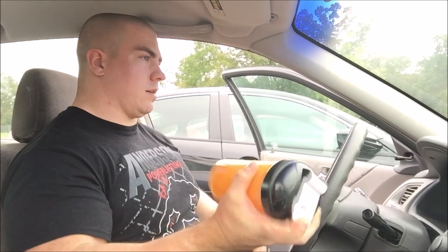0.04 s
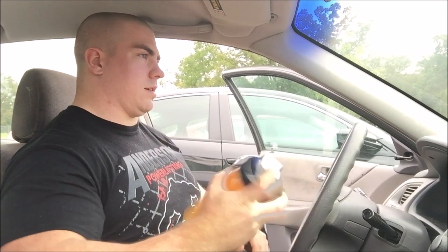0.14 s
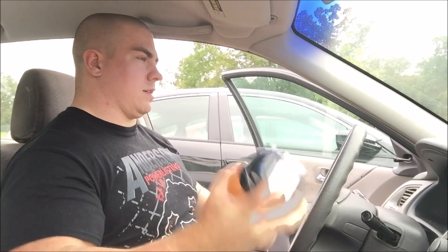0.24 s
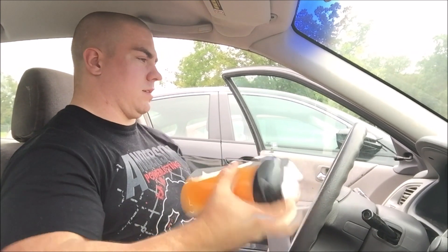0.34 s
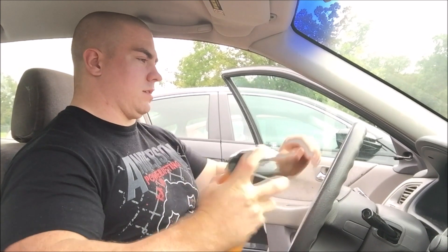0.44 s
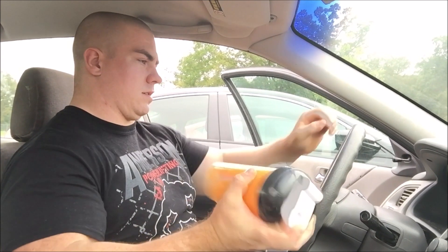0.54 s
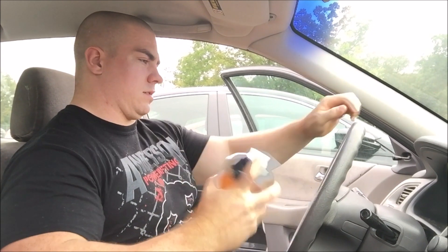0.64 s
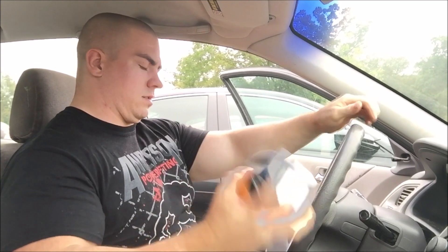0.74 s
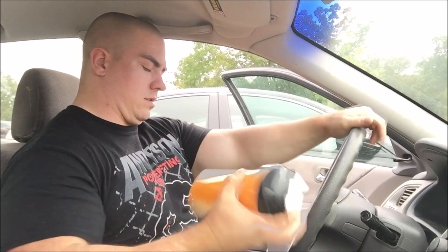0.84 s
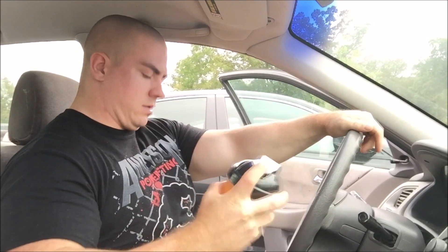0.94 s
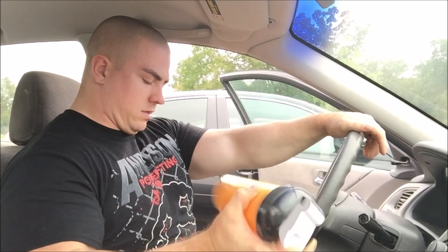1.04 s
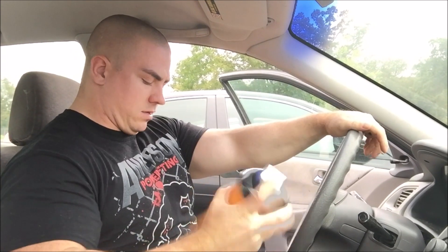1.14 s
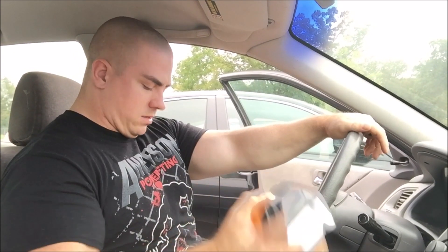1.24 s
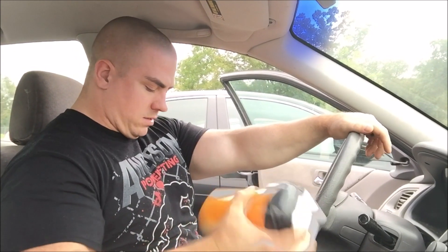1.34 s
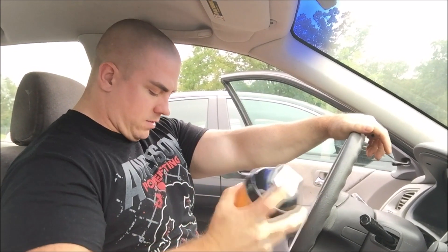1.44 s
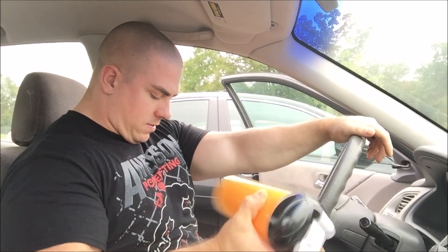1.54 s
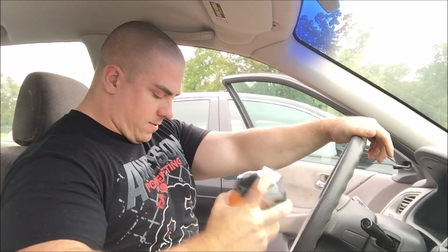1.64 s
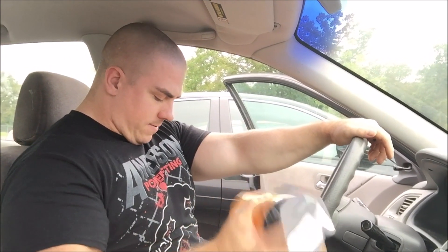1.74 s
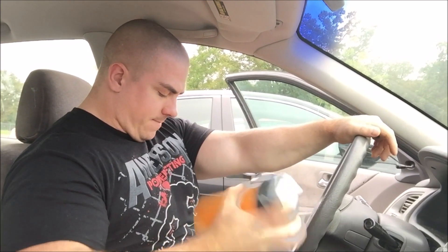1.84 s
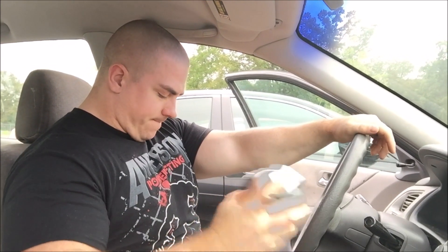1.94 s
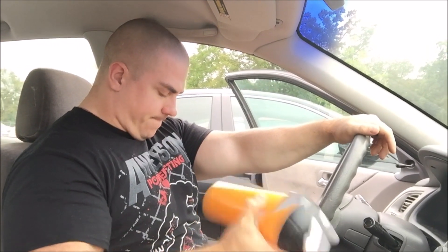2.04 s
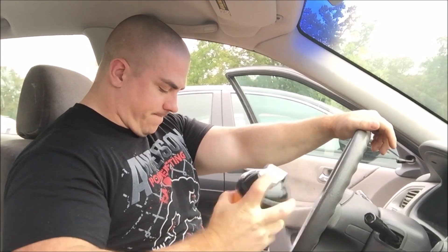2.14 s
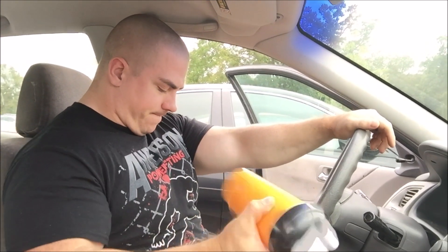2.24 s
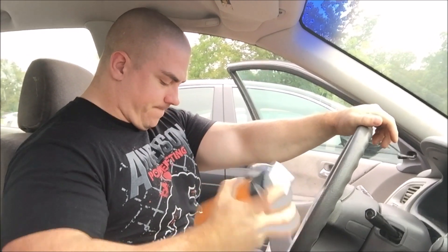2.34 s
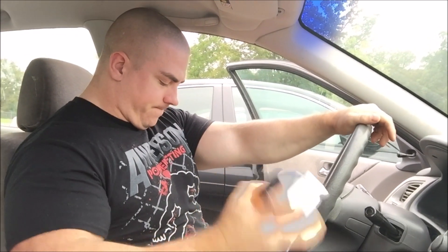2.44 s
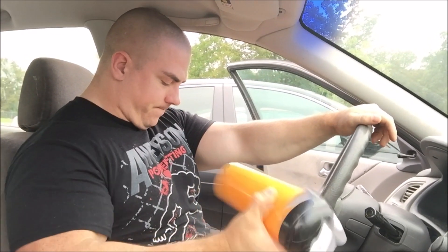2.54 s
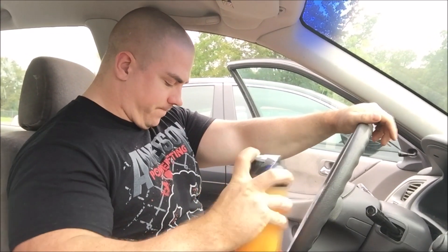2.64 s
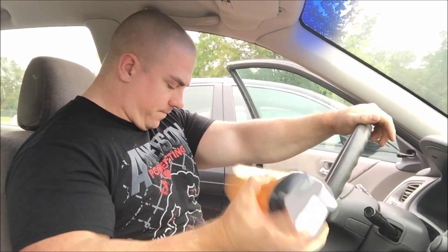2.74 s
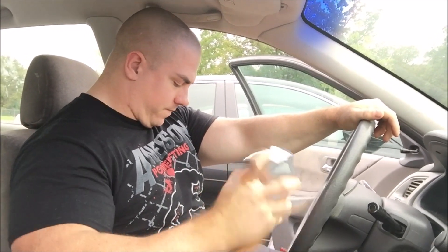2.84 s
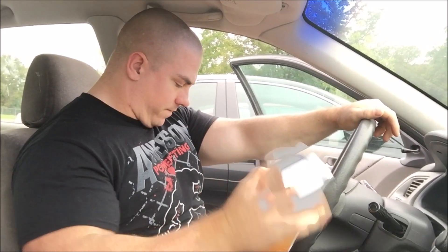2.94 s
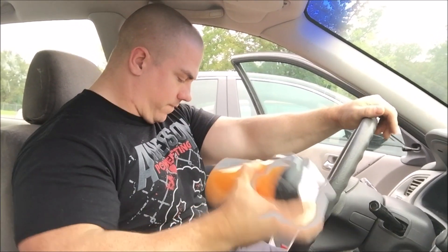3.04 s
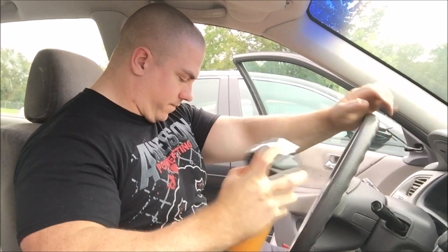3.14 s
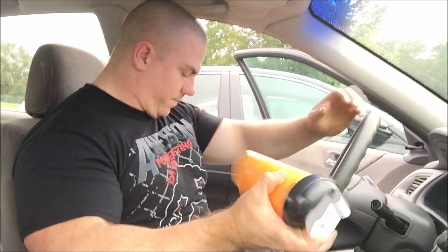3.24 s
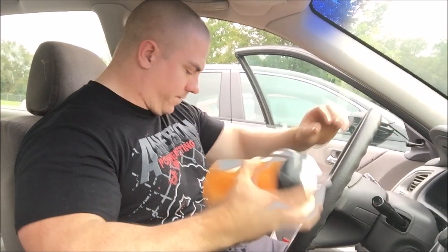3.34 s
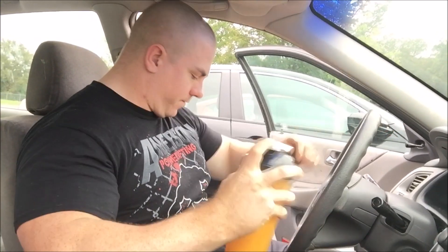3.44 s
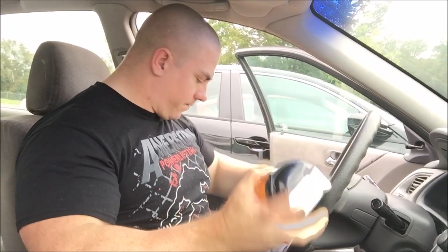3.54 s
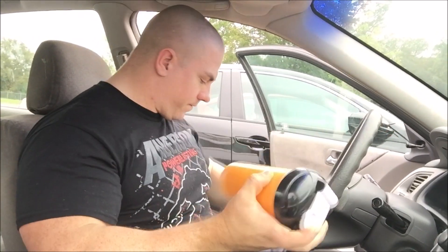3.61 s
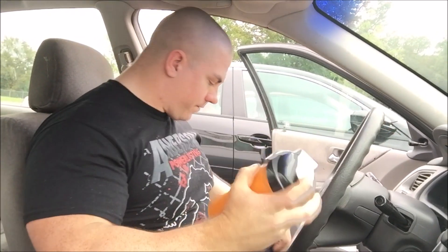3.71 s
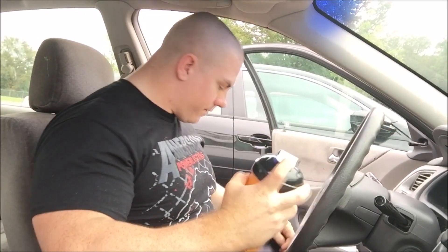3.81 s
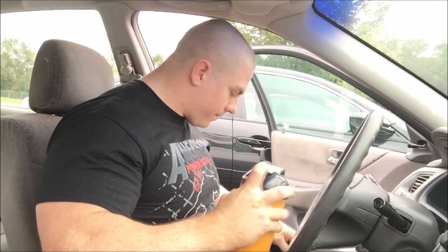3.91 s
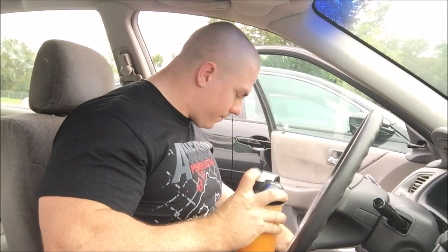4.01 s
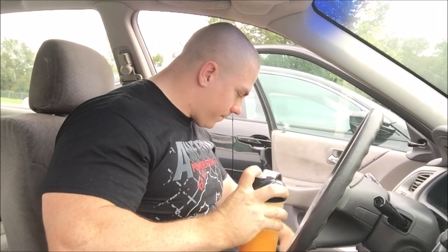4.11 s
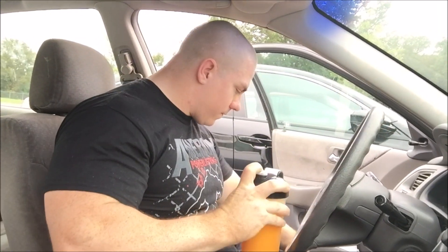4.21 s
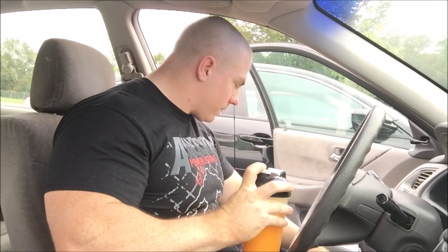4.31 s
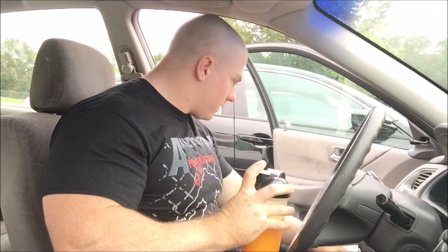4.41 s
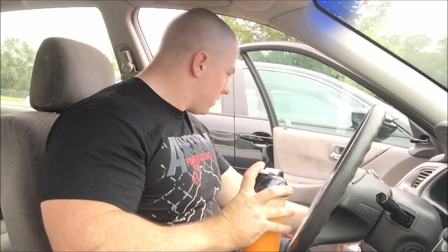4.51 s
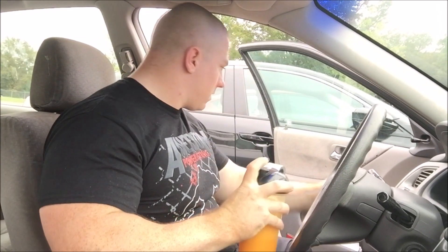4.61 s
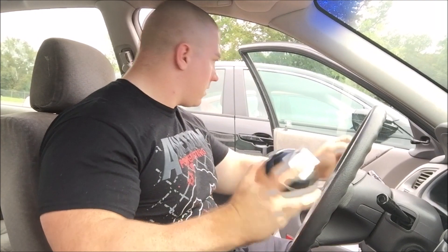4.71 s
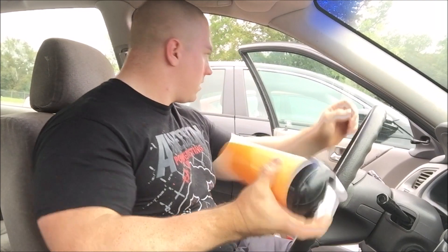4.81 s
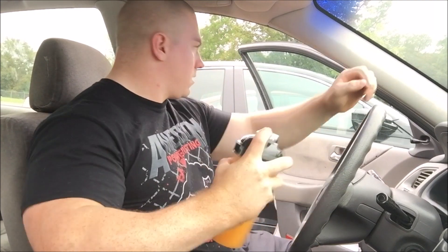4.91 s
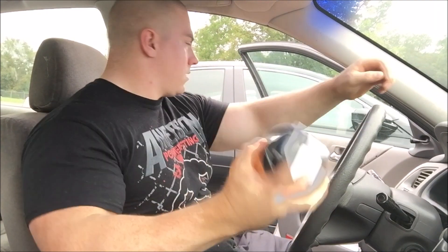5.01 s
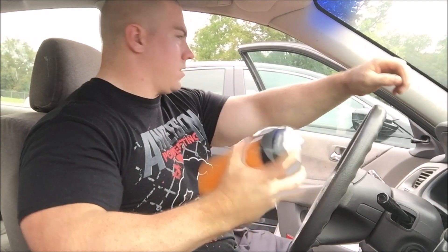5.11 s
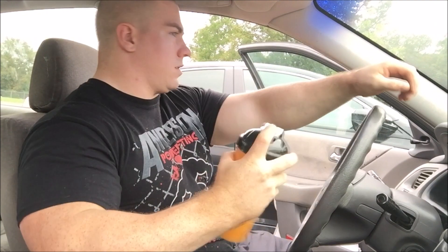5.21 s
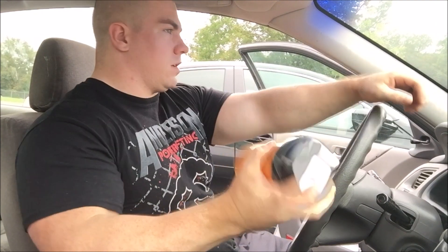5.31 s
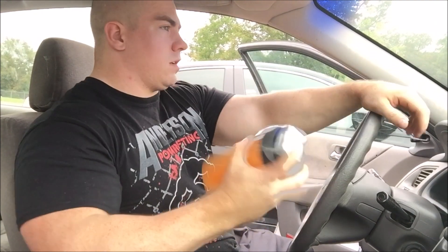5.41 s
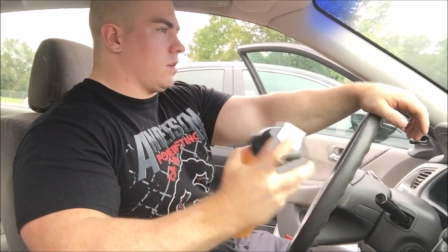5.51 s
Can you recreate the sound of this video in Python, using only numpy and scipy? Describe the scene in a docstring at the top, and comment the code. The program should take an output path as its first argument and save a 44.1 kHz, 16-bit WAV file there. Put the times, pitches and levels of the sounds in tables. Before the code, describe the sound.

Inside a parked car with a door open, liquid sloshes rapidly in a plastic bottle, clicking against the lid and gulping at the base. After more than three seconds it settles, and a soft low bump and a faint tick are heard before a last short round of shaking. The sound is close and fairly dry, with a low rumble from outside and two very faint hums underneath.

```python
"""Liquid sloshes in a plastic shaker bottle, shaken hard in a parked car with the door open.
About eight times a second it slams into the lid (bright spray, short rings of the cap) or into the
base (lower rings, dull glugs of trapped air). Low outdoor rumble runs underneath, with two dull bumps
and two faint hums. The shaking pauses, a small tick sounds, and the shaking briefly resumes."""
import sys
import numpy as np
from scipy import signal
from scipy.fft import rfft, irfft, next_fast_len
from scipy.io import wavfile

SR = 44100
rng = np.random.default_rng(int(sys.argv[2]) if len(sys.argv) > 2 else 0)


def wav_record(signal):
    """Record a signal, one row per channel, as 16-bit PCM in the file named by sys.argv[1]."""
    frames = np.transpose(np.atleast_2d(signal))
    bounded = np.clip(frames, -1, 1)
    # unit amplitude maps onto the largest positive 16-bit level
    quanta = np.round(bounded * 32767).astype(np.int16)
    wavfile.write(sys.argv[1], SR, quanta)


N = 245460


def amp(db):
    """dB to gain."""
    return 10 ** (np.asarray(db) / 20)


def unit_rms(x):
    """Scale to rms 1."""
    return x / np.sqrt(np.mean(x ** 2) + 1e-20)


def curves(rows):
    """Columns of a breakpoint table, one value per sample."""
    times_s, *columns = np.transpose(rows)
    return [np.interp(np.arange(N) / SR, times_s, column) for column in columns]


def add(out, start_s, sound):
    """Mix a sound in at start_s."""
    at = round(start_s * SR)
    out[at:at + len(sound)] += sound[:N - at]


def coloured(x, spectrum):
    """Shape x by a spectrum, -80 dB outside its ends; rms 1."""
    hz, db = np.transpose(spectrum)
    size = next_fast_len(N)
    log_hz = np.log(np.maximum(np.arange(size // 2 + 1) * SR / size, 1))
    gain = amp(np.interp(log_hz, np.log(hz), db, left=-80, right=-80))
    return unit_rms(irfft(rfft(x, size) * gain, size)[:N])


def drift(rate_hz):
    """Slow random wander; rms 1."""
    pole = np.exp(-2 * np.pi * rate_hz / SR)
    return unit_rms(signal.lfilter([1], [1, -2 * pole, pole ** 2], rng.standard_normal(N + SR))[SR:])


def ring(peak_db, hz, t60_s, rise_s, glide=0.):
    """One mode swells and dies; its pitch ends at hz * (1 + 2 * glide)."""
    t = np.arange(int(t60_s * SR)) / SR
    envelope = (1 - np.exp(-t / rise_s)) * amp(-60 * t / t60_s)
    phase = 2 * np.pi * hz * t * (1 + glide * t / t60_s)
    return amp(peak_db) * envelope / envelope.max() * np.sin(phase)


def droplets(spectrum, spread_db, clump_db, clump_hz):
    """Dense drop impacts of uneven size, in clumps."""
    sizes = amp(spread_db * np.minimum(rng.exponential(1, N), 5))
    return coloured(rng.standard_normal(N) * sizes * amp(clump_db * drift(clump_hz)), spectrum)


def pings(spectrum, low_hz, high_hz, per_s, cycles, spread_db, pitches=20):
    """Bursting bubbles or rattled plastic: random impulses, each ringing at one of many pitches."""
    sizes = amp(spread_db * np.minimum(rng.exponential(1, N), 5))
    hits = sizes * (rng.random(N) < per_s / SR)
    pitch_index, out = rng.integers(0, pitches, N), np.zeros(N)
    for k, hz in enumerate(np.geomspace(low_hz, high_hz, pitches)):
        r, w = amp(-60 * hz / cycles / SR), 2 * np.pi * hz / SR
        drive = hits * (pitch_index == k) + 1e-18
        out += signal.lfilter([0, np.sin(w)], [1, -2 * r * np.cos(w), r * r], drive)
    return coloured(out, spectrum)


# Liquid running along the wall: (time [s], bright level [dB], low level [dB])
SLOSH_LEVELS = [(0, -55.5, -54.5), (1.45, -61.5, -59), (1.52, -65, -55.5), (1.6, -63.5, -59.5),
                (2.56, -59, -56.5), (2.61, -70, -77), (2.66, -55, -54), (3.4, -59, -60), (3.47, -67, -56),
                (3.53, -61, -63), (3.68, -76, -65.5), (3.75, -76, -69), (3.95, -83.5, -66),
                (4.15, -80.5, -73), (4.925, -87, -79), (4.95, -73, -69), (5.57, -65, -61)]


def slosh_power(offsets_db=(6.5, 3.0, -7.0, 3.0, -3.5, 5.0)):
    """Sloshing between slams; one power curve per stream: splash, cap, spray, belly, gulp, wall."""
    bright_db, low_db = curves(SLOSH_LEVELS)
    levels_db = np.array([bright_db, bright_db, bright_db, low_db, low_db, bright_db])
    return amp(levels_db + np.array(offsets_db)[:, None]) ** 2


# Spectra of the six streams: (frequency [Hz], relative level [dB])
SPLASH_SPECTRUM = [(1800, 1), (2700, -1.5), (3400, -0.5), (4300, -0.5), (4860, -5), (5360, -2),
                   (7500, -12.5), (9500, -38)]
CAP_SPECTRUM = [(1900, -18), (2200, -0.5), (2350, -4.5), (2500, -1), (2650, -21.5), (2900, -20), (3300, 13)]
SPRAY_SPECTRUM = [(5500, 2), (7900, -2.5), (10200, -8), (11300, -7.5), (15100, -14.5), (16500, -17)]
BELLY_SPECTRUM = [(600, -18), (760, -13), (930, -8), (1150, -8.5), (1480, -6.5), (1950, -9.5), (2400, -31)]
GULP_SPECTRUM = [(170, 1), (260, -3), (330, -1), (450, -0.5), (560, -10.5), (700, -17)]
WALL_SPECTRUM = [(1400, -1.5), (1800, -8.5), (1950, -4), (2100, -2), (2250, -10.5), (2500, -17.5),
                 (2900, 5)]


def liquid(power, foam_share=0.38, mix_db=(-1.5, -5.5, -3.0, -0.5, 0.25, -5.5)):
    """Liquid splashes, foams, sprays and gulps, and rings cap, belly and wall, following power."""
    drops = droplets(SPLASH_SPECTRUM, spread_db=2.5, clump_db=3.5, clump_hz=61)
    foam = pings(SPLASH_SPECTRUM, 2445, 8600, per_s=1400, cycles=49, spread_db=2.5, pitches=45)
    splash = np.sqrt(1 - foam_share) * drops + np.sqrt(foam_share) * foam
    cap = pings(CAP_SPECTRUM, 2257, 2670, per_s=600, cycles=63, spread_db=2.5)
    wall = pings(WALL_SPECTRUM, 1740, 2710, per_s=1500, cycles=31, spread_db=3.0, pitches=30)
    spray = droplets(SPRAY_SPECTRUM, spread_db=2.0, clump_db=2.5, clump_hz=31)
    belly = pings(BELLY_SPECTRUM, 705.5, 2320, per_s=600, cycles=37, spread_db=-0.5)
    gulp = droplets(GULP_SPECTRUM, spread_db=1.5, clump_db=2.5, clump_hz=23.5)
    streams = np.array([splash, cap, spray, belly, gulp, wall])
    return amp(mix_db) @ (np.sqrt(power) * streams)


# Outdoor rumble: (time [s], level [dB])
RUMBLE_LEVELS = [(0, -40), (.2, -47.5), (.45, -44.5), (1, -47), (1.85, -44), (3, -51), (5.57, -47)]


def rumble(band_hz=(48, 95)):
    """Bass noise from outdoors swells and ebbs."""
    bandpass = signal.butter(3, band_hz, "band", fs=SR, output="sos")
    return amp(curves(RUMBLE_LEVELS)[0]) * unit_rms(signal.sosfilt(bandpass, rng.standard_normal(N)))


# Outdoor noise: (frequency [Hz], relative level [dB])
OUTDOOR_SPECTRUM = [(25, -33), (38, -16), (70, -7), (150, -11.5), (240, -14.5), (340, -23), (450, -35),
                    (1100, -36), (2100, -45), (6500, -50.5), (9500, -55), (16400, -61)]


def outdoor_air(level_db=-50, waver_db=3.0, waver_below_hz=600):
    """Broad noise through the open door; the low end wavers."""
    air = amp(level_db) * coloured(rng.standard_normal(N), OUTDOOR_SPECTRUM)
    low = signal.sosfilt(signal.butter(2, waver_below_hz, fs=SR, output="sos"), air)
    return air + (amp(waver_db * drift(rate_hz=2.9)) - 1) * low


# Liquid hitting an end: (time [s], splash level [dB], position [0 lid, 1 base], length [s])
LIQUID_SLAMS = [(0.005, -57.5, 1, 0.059), (0.143, -36.5, 0.22, 0.014), (0.171, -38.5, 0.5, 0.013),
                (0.21, -41.5, 0.16, 0.016), (0.3, -42, 0.52, 0.054), (0.407, -39.5, .02, 0.0075),
                (0.435, -34, 0.28, 0.0096), (0.55, -42, 0.58, 0.021), (0.592, -42.5, 0.52, 0.017),
                (0.641, -36, 0.26, 0.035), (0.724, -46.5, 0.57, 0.021), (0.806, -46, 0.76, 0.028),
                (0.927, -31, 0.3, 0.0094), (1.049, -46.5, 0.89, 0.01), (1.086, -45.5, 0.61, 0.0035),
                (1.167, -44.5, 0.022, 0.043), (1.197, -49.5, 0.5, 0.075), (1.296, -43.5, 0.69, 0.031),
                (1.415, -37.5, 0.071, 0.029), (1.433, -39, 0.57, 0.012), (1.541, -52.5, 0.97, 0.036),
                (1.554, -49, 0.69, 0.0082), (1.629, -45.5, 0.35, 0.022), (1.666, -46.5, 0.49, 0.092),
                (1.774, -46, 0.65, 0.06), (1.906, -32.5, 0.14, 0.009), (1.914, -41.5, 0.45, 0.015),
                (1.935, -47, 0.58, 0.039), (2.019, -47.5, 0.93, 0.037), (2.062, -46, 0.24, 0.025),
                (2.142, -40, 0.16, 0.042), (2.255, -57, 1, 0.046), (2.307, -50.5, 0.2, 0.02),
                (2.368, -41, 0.39, 0.056), (2.491, -46, 0.79, 0.008), (2.54, -48, 0.5, 0.049),
                (2.627, -41.5, 0.18, 0.028), (2.663, -50, 0.61, 0.051), (2.739, -42, 0.57, 0.045),
                (2.842, -36, 0.28, 0.0088), (2.873, -35.5, 0.23, 0.0081), (3, -44.5, 0.8, 0.033),
                (3.053, -49, 0.36, .02), (3.096, -36, 0.059, 0.031), (3.237, -52, 0.91, 0.026),
                (3.276, -45, 0.66, 0.014), (3.342, -42.5, 0.26, 0.071), (3.507, -46, 0.81, 0.019),
                (3.56, -53.5, 0.67, 0.049), (3.622, -43.5, 0.19, 0.031), (4.39, -66.5, 0.18, 0.035),
                (4.93, -46.5, 0.086, 0.028), (5.005, -50.5, 0.72, 0.052), (5.091, -54.5, 0.15, 0.046),
                (5.132, -46, .02, 0.044), (5.168, -40, 0.24, 0.033), (5.287, -58, 1, 0.029),
                (5.331, -48.5, 0.33, 0.0087), (5.419, -46, 0.081, 0.054), (5.447, -54, 1, 0.031)]


def slam_power(rush_lead_s=0.012, rush_db=-14, usual_slam_db=-49, spray_db_per_db=0.4033):
    """Each slam rushes in, swells, holds and dies; one power curve per stream."""
    # splash, cap, spray, belly, gulp, wall
    lid_db = np.array([0, -0.5, -11, -18, -25.5, -11])
    base_db = np.array([0, 2, -17.5, 6.5, 7.5, 10])
    rises_s = (0.0038, 0.0096, 0.0018, 0.0042, 0.0047, 0.0037)
    t60s_s = (0.14, 0.24, 0.14, 0.12, 0.2, 0.3)
    t = np.arange(SR // 2) / SR
    rush_s = 2 * rush_lead_s
    rush = np.sin(np.pi * (t[t < rush_s] / rush_s) ** 2)
    power = np.zeros((6, N))
    for start_s, db, position, length_s in LIQUID_SLAMS:
        levels_db = db + (1 - position) * lid_db + position * base_db
        levels_db[2] += spray_db_per_db * (db - usual_slam_db)   # harder slam, more spray
        after_s = np.maximum(t - length_s, 0)
        for stream, level_db, rise_s, t60_s in zip(power, levels_db, rises_s, t60s_s):
            swell = 1 - np.exp(-(t / (rise_s + 0.095 * length_s)) ** 2)   # longer slam, slower swell
            add(stream, start_s, (swell * amp(level_db - 60 * after_s / t60_s)) ** 2)
            if start_s > rush_lead_s:
                add(stream, start_s - rush_lead_s, (rush * amp(level_db + rush_db)) ** 2)
    return power


# Dull bumps: (time [s], peak [dB], starting pitch [Hz])
LOW_BUMPS = [(0.024, -29, 126), (4.39, -28, 99)]


def bumps():
    """Short low rings that fall in pitch."""
    out = np.zeros(N)
    for start_s, db, hz in LOW_BUMPS:
        add(out, start_s, ring(db, hz, t60_s=0.11, rise_s=0.0032, glide=-0.28))
    return out


# Short rings, higher at the lid, lower at the base: (time [s], main mode peak [dB], pitch [Hz])
BOTTLE_KNOCKS = [(0.149, -38, 2500), (0.2384, -34, 2140), (0.412, -33, 2400), (0.444, -21.5, 2250),
                 (0.596, -29, 2100), (0.65, -33, 2310), (0.663, -26, 2430), (0.914, -37.5, 2500),
                 (0.932, -26, 2630), (1.191, -34.5, 2320), (1.228, -35.5, 2210), (1.3049, -39, 1950),
                 (1.346, -35.5, 2020), (1.407, -39, 2910), (1.429, -27, 2490), (1.579, -33.5, 2515),
                 (1.686, -31, 2420), (1.9122, -34, 2380), (1.925, -27, 2480), (1.952, -38, 2480),
                 (1.975, -37, 2420), (2.033, -37, 1750), (2.156, -38, 2600), (2.166, -32.5, 2320),
                 (2.183, -32, 2480), (2.301, -40, 2600), (2.3182, -34.5, 2140), (2.38, -27.5, 2510),
                 (2.635, -26, 2353), (2.651, -27, 2473), (2.8502, -28.5, 2630), (2.877, -35, 5310),
                 (2.9, -30.5, 2330), (3.1048, -28.5, 2450), (3.126, -30.5, 2370), (3.243, -38.5, 1840),
                 (3.288, -37, 2390), (3.3804, -32.5, 2380), (3.5051, -33.5, 2040), (3.634, -35, 2805),
                 (3.6415, -32, 2500), (3.657, -42.5, 2405), (3.707, -43, 2434), (5.1104, -38.5, 2620),
                 (5.1722, -33, 2600), (5.192, -38, 2500), (5.433, -38, 2510), (5.466, -38.5, 2436)]


def knocks(t60_s=0.021, twin_ratio=1.1, twin_db=-9, linger_db=-13):
    """Liquid hits either end: two close modes ring briefly and a fainter ring lingers."""
    out = np.zeros(N)
    for start_s, db, hz in BOTTLE_KNOCKS:
        add(out, start_s, ring(db, hz, t60_s, rise_s=0.00046))
        add(out, start_s, ring(db + twin_db, hz * twin_ratio, t60_s, rise_s=0.0026))
        add(out, start_s, ring(db + linger_db, hz, t60_s=0.097, rise_s=t60_s / 2))
    return out


def crack_power(splash_db=-13, spray_db=-22, rise_s=0.0016, t60_s=0.04):
    """Each knock throws a burst of power into the splash and spray streams."""
    t = np.arange(SR // 2) / SR
    burst = np.minimum(t / rise_s, 1) * amp(-60 * t / t60_s)
    power = np.zeros((6, N))
    for start_s, db, _ in BOTTLE_KNOCKS:
        add(power[0], start_s, (amp(db + splash_db) * burst) ** 2)
        add(power[2], start_s, (amp(db + spray_db) * burst) ** 2)
    return power


# Air pockets gulped by the liquid: (time [s], peak [dB], pitch [Hz])
AIR_POCKETS = [(0.151, -36.5, 960), (0.335, -43, 464), (0.568, -34.5, 920), (0.68, -36, 319),
               (0.72, -42, 1080), (0.82, -38, 460), (0.935, -35.5, 1180), (1.302, -44, 367),
               (1.553, -35.5, 475), (1.782, -34.5, 1000), (1.805, -38, 304), (2.028, -33.5, 384),
               (2.036, -34.5, 870), (2.044, -34, 1110), (2.268, -41, 485), (2.755, -39, 396),
               (2.775, -39, 315), (3.019, -33.5, 930), (3.051, -39, 896), (3.25, -38.5, 448),
               (3.512, -34.5, 1240), (3.52, -41, 924), (3.522, -43, 463), (5.009, -43.5, 334),
               (5.088, -41.5, 328), (5.295, -45, 342), (5.465, -41, 1120)]


def glugs(cycles=24):
    """A trapped pocket rings a set number of cycles, rising slightly in pitch."""
    out = np.zeros(N)
    for start_s, db, hz in AIR_POCKETS:
        add(out, start_s, ring(db, hz, t60_s=cycles / hz, rise_s=1.4 / hz, glide=0.0075))
    return out


# Faint tones: (start [s], end [s], level [dB], first pitch [Hz], last pitch [Hz])
FAINT_HUMS = [(2.307, 2.493, -54, 233, 232.6), (4.546, 5.398, -61.5, 343, 352.3)]


def hums(fade_s=0.017, waver_db=3.5):
    """Each tone fades in, glides slightly, wavers in level and fades out."""
    t, out = np.arange(N) / SR, np.zeros(N)
    for start_s, end_s, db, first_hz, last_hz in FAINT_HUMS:
        hz = np.interp(t, [start_s, end_s], [first_hz, last_hz])
        fade = np.clip(np.minimum(t - start_s, end_s - t) / fade_s, 0, 1)
        out += np.sqrt(2) * fade * amp(db) * np.sin(2 * np.pi * np.cumsum(hz) / SR)
    return out * amp(waver_db * drift(rate_hz=11))


def tick(start_s=4.488, level_db=-59, hz=6300, t60_s=0.05):
    """A small burst of bright noise in the pause."""
    t, out = np.arange(int(t60_s * SR)) / SR, np.zeros(N)
    noise = coloured(rng.standard_normal(N), [(hz / 3, -15), (hz, 0), (hz * 1.5, -15)])
    add(out, start_s, amp(level_db - 60 * t / t60_s) * noise[:len(t)])
    return out


def cabin(x, t60_s=0.12, tail_db=-16.5, delay_s=0.002):
    """The small padded cabin adds a short, dull tail."""
    t = np.arange(int(t60_s * SR)) / SR
    dull_noise = signal.lfilter([1], [1, -0.6], rng.standard_normal(len(t)))
    tail = dull_noise * amp(-60 * t / t60_s) * (t > delay_s)
    return x + amp(tail_db) * signal.fftconvolve(x, tail / np.linalg.norm(tail))[:N]


def scene():
    """Bottle in the cabin, plus surroundings; mono."""
    bottle = liquid(slosh_power() + slam_power() + crack_power()) + knocks() + glugs()
    return (cabin(bottle) + rumble() + outdoor_air() + bumps() + hums() + tick())[None]


def record(dry, dip_hz=10480, dip_width_hz=660, dip_depth=0.41, stopband_hz=16420):
    """The microphone has a narrow treble dip; the top is cut."""
    dip_band = signal.lfilter(*signal.iirpeak(dip_hz, dip_hz / dip_width_hz, SR), dry)
    lowpass = signal.cheby2(20, 60, stopband_hz, fs=SR, output="sos")
    return signal.sosfilt(lowpass, dry - dip_depth * dip_band)


dry = scene()
out = record(dry)
wav_record(out)
```